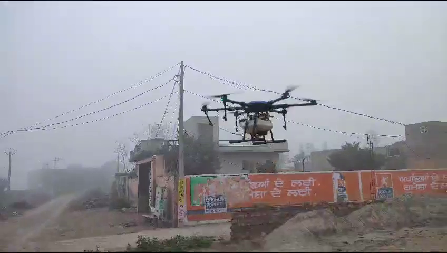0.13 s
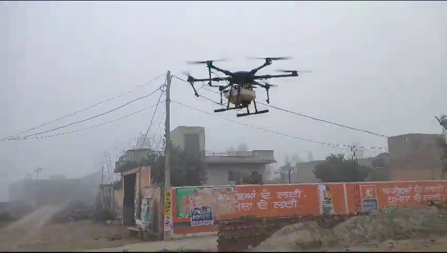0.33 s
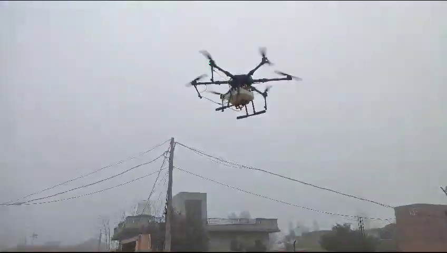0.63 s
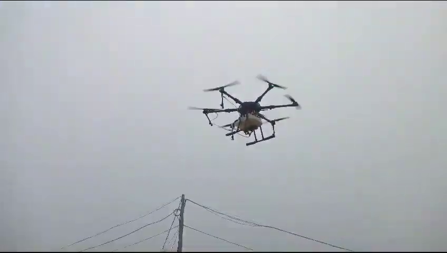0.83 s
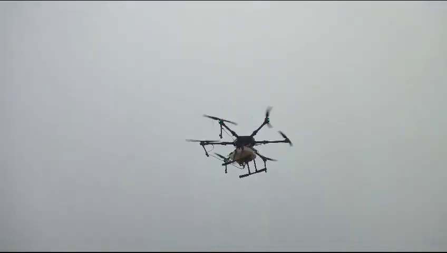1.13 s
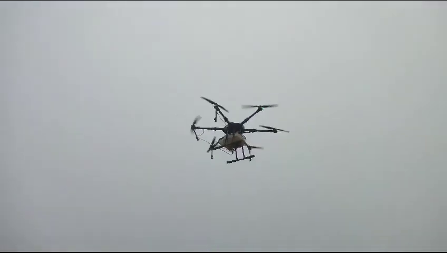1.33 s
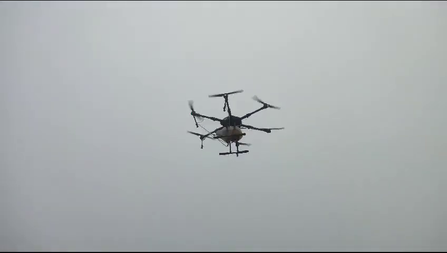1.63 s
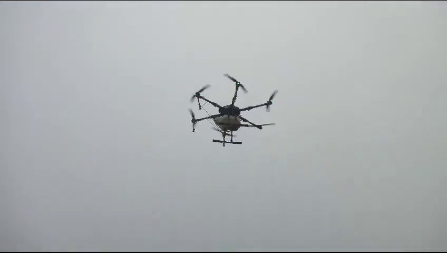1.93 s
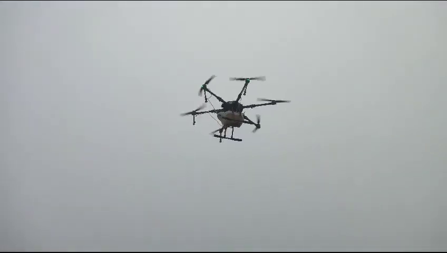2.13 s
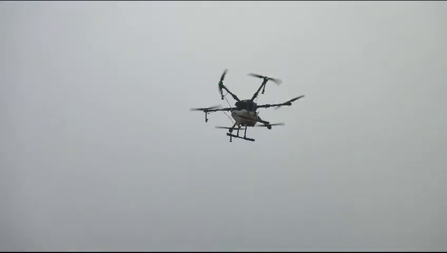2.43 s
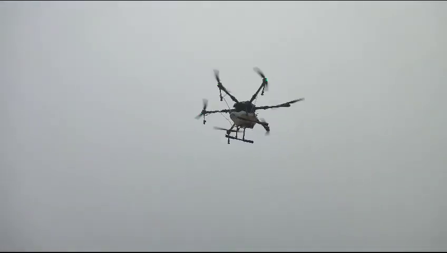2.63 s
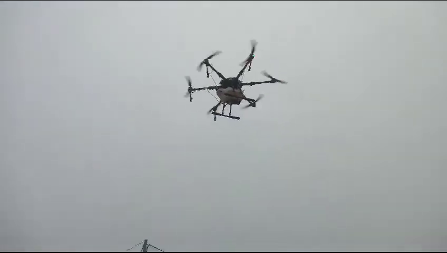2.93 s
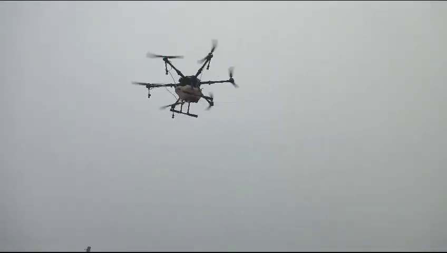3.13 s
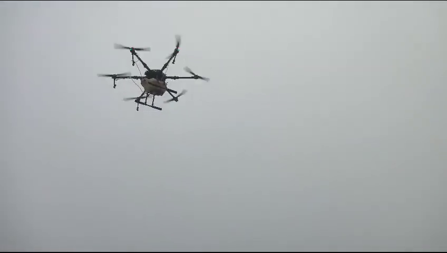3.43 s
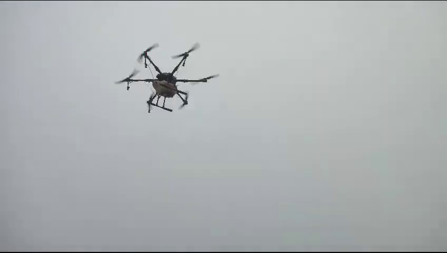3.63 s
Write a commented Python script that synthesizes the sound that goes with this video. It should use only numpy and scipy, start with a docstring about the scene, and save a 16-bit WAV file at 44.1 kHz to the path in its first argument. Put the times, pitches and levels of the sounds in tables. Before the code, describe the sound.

A big multi-rotor drone flies with a wavering buzz, choppy blade slap and hiss.

```python
"""A throbbing hum and buzz: a large six-rotor drone climbs and hovers in open air above a phone.
Rotors at slightly different speeds beat against each other. Each blade pass gives a pulse (buzz, and
a sharper slap under load) and a puff of tip hiss. In the turn, some rotors slow down and then catch
up. Light wind rumbles on the microphones."""
import sys
import numpy as np
from scipy import signal
from scipy.fft import rfft, irfft, next_fast_len
from scipy.io import wavfile
from scipy.ndimage import uniform_filter1d, map_coordinates

SR = 44100
rng = np.random.default_rng(int(sys.argv[2]) if len(sys.argv) > 2 else 0)


def log_audio(samples):
    """Write samples as a 16-bit WAV file to the path given in sys.argv[1]."""
    # one column per channel
    frames = np.atleast_2d(samples).T
    # limit to full scale, then quantise
    limited = np.clip(frames, -1, 1)
    pcm = np.round(limited * 32767).astype(np.int16)
    wavfile.write(sys.argv[1], SR, pcm)


N = 166257
T = np.arange(N) / SR
N_FFT = next_fast_len(N + 8192)
LOG_HZ = np.log(np.maximum(np.arange(N_FFT // 2 + 1) * SR / N_FFT, 1))

# Layer faders through the flight, before trims: time_s, buzz_db, slap_db, tip_hiss_db, top_hiss_db
FADERS = [(0.1, -41.5, -44, -52, -58.5), (0.31, -34.5, -46, -44.5, -49.5), (0.58, -42.5, -50, -46.5, -52),
          (1.0, -45, -47.5, -46, -51), (1.15, -43.5, -48.5, -44.5, -51), (1.6, -40.5, -37.5, -43.5, -54),
          (1.92, -38.5, -27.5, -34, -48), (2.08, -39, -30.5, -38.5, -51), (2.14, -33.5, -30, -37.5, -50),
          (2.2, -41.5, -27, -34.5, -50), (2.32, -38.5, -27, -37, -49.5), (2.68, -31.5, -27, -36.5, -48.5),
          (2.72, -28, -23, -36, -48), (2.78, -28, -24.5, -32.5, -45), (3.01, -35.5, -20.5, -39.5, -50.5),
          (3.05, -33, -21, -35, -44), (3.08, -33.5, -26.5, -38.5, -50), (3.2, -34, -31, -39.5, -50),
          (3.28, -35.5, -34, -40, -52), (3.37, -38, -43, -42.5, -53.5), (3.64, -41, -41, -45, -54),
          (3.67, -35, -42, -45, -55), (3.77, -35.5, -41, -47, -56)]
# Bright tone of the blade tips: freq_hz, gain_db
TIP_EQ = [(2000, -22), (2900, -6), (3800, -8.5), (4800, -2), (7200, -2.5), (8000, -15.5), (9000, -52),
          (11000, -47)]


def amp(db):
    return 10 ** (np.asarray(db) / 20)


def curve(table, col=1):
    points = np.array(table, float)
    return np.interp(T, points[:, 0], points[:, col])


def over_hz(table):
    points = np.array(table, float)
    return np.interp(LOG_HZ, np.log(points[:, 0]), points[:, 1])


def colour(x, eq, lo_hz, hi_hz):
    """Minimum-phase EQ, scaled to rms 1 between lo_hz and hi_hz."""
    cepstrum = irfft(over_hz(eq) * np.log(10) / 20, N_FFT)
    cepstrum[1:N_FFT // 2] *= 2
    cepstrum[N_FFT // 2 + 1:] = 0
    spectrum = rfft(x, N_FFT) * np.exp(rfft(cepstrum))
    band = spectrum[..., int(lo_hz * N_FFT / SR):int(hi_hz * N_FFT / SR)]
    rms = np.sqrt(2 * np.mean(np.sum(abs(band) ** 2, -1)) / N_FFT / N)
    return irfft(spectrum, N_FFT)[..., :N] / rms


def wander(rate_hz):
    """Smooth random drift: held steps, slewed twice."""
    hold = int(SR / rate_hz)
    steps = np.repeat(rng.standard_normal(N // hold + 1), hold)
    return 1.302 * uniform_filter1d(uniform_filter1d(steps, hold), hold)[:N]


def blade_clicks(passes, gain, mic_lag_s, jitter_s=.00004, scatter_db=1.5):
    """One slightly uneven click per blade pass, reaching the two microphones at different times."""
    count = np.arange(np.ceil(passes[0]), passes[-1])
    chance = rng.standard_normal((600, 2))[:len(count)]
    at_s = np.interp(count, passes, T) + jitter_s * chance[:, 0]
    size = amp(scatter_db * chance[:, 1]) * np.interp(at_s, T, gain)
    clicks = np.zeros((2, N))
    for ch in range(2):
        centre = (at_s[:, None] + mic_lag_s * (ch - .5)) * SR
        taps = np.floor(centre) + np.arange(-7, 9)
        offset = taps - centre
        pulses = size[:, None] * np.sinc(offset) * np.cos(np.pi * offset / 16) ** 2
        np.add.at(clicks[ch], np.clip(taps, 0, N - 1).astype(int), pulses)
    return clicks


def rotors(speed_spread=.004, puff_decay_passes=1):
    """Three rotor pairs beat into a hum; their blade passes drive the buzz, slap and puffs."""
    # Leading pair: time_s, blade_pass_hz
    lead_speed = [(0.08, 130.8), (0.2, 127.7), (0.3, 121.4), (0.44, 115.5), (0.55, 103.0), (0.63, 102.2),
                  (0.78, 103.7), (0.93, 96.3), (0.98, 98.9), (1.17, 114.0), (1.33, 122.4), (1.44, 125.5),
                  (1.6, 123.6), (1.78, 124.1), (1.86, 121.7), (1.97, 114.4), (2.1, 104.5), (2.2, 114.8),
                  (2.32, 120.7), (2.46, 127.4), (2.62, 128.7), (2.77, 139.3), (2.85, 136.6), (2.99, 131.8),
                  (3.15, 130.5), (3.3, 125.7), (3.5, 128.7), (3.77, 132.4)]
    # Second pair, cancelling the lead's hum at half passes: time_s, passes_behind, level_db
    slip = [(-.05, -.5, -4), (.16, .5, -5), (.40, 1.5, -4), (.60, 2.5, -3), (.753, 3.5, 0), (1.139, 4.5, 0),
            (1.308, 5.5, -1), (1.51, 6.5, -5), (1.715, 7.5, 0), (1.959, 8.5, -2), (2.12, 9.1, -3),
            (2.302, 8.5, -1), (2.685, 7.5, -3), (2.99, 6.5, -4), (3.141, 5.5, -1), (3.29, 4.9, -2),
            (3.457, 5.5, -.5), (3.716, 6.5, -2), (3.95, 7.5, -2)]
    # Slowest pair, lagging at lift-off and in the turn: time_s, blade_pass_hz, level_db
    slow = [(.05, 125, -13), (.3, 102, -4), (.5, 114, -1), (.7, 58, -36), (2.05, 92, -20), (2.2, 96, -1),
            (2.4, 78, -29), (2.65, 114, -16), (2.8, 91, -5.5), (2.92, 109, -0.5), (3.05, 109, -3),
            (3.17, 130, -2), (3.27, 82, -13), (3.4, 95, -52)]
    # Hum of a pair at full level: time_s, level_db
    hum_fader = [(.1, -37), (.31, -31.5), (.5, -35.5), (.68, -38.5), (.85, -45), (1.05, -35.5), (1.22, -40),
                 (1.42, -30), (1.85, -35.5), (2.15, -35), (2.45, -29.5), (2.85, -34.5), (3.05, -37.5),
                 (3.3, -34), (3.65, -35)]
    # Balance of the six rotors: pair_index, buzz_db, slap_db
    balance = [(0, 0, 0), (0, -2, -3), (1, -1, -6), (1, -3, -8), (2, -1, -9), (2, -6, -12)]
    lead_hz = curve(lead_speed)
    lead = np.cumsum(lead_hz) / SR
    pairs = [(lead, np.ones(N)),
             (lead - uniform_filter1d(curve(slip), SR // 10), amp(curve(slip, 2))),
             (np.cumsum(curve(slow)) / SR, amp(curve(slow, 2)))]
    hum = sum(gain * np.cos(2 * np.pi * phase) for phase, gain in pairs) * amp(curve(hum_fader))
    buzz, slap, puffs = 0, 0, 0
    for k, (pair, buzz_db, slap_db) in enumerate(balance):
        phase, gain = pairs[int(pair)]
        passes = phase + rng.random()
        drift = np.cumsum(speed_spread * wander(4) * lead_hz) / SR
        passes += k % 2 * drift  # one of each pair strays from its twin
        wobble = amp(2 * wander(5.124))
        clicks = blade_clicks(passes, gain * wobble, mic_lag_s=.00014 * rng.standard_normal())
        buzz -= amp(buzz_db) * clicks
        slap -= amp(slap_db) * clicks
        puffs += gain ** 2 * np.exp(-(passes % 1) / puff_decay_passes)
    return hum, buzz, slap, puffs


def blade_buzz(clicks, shelf_hz=323, trim_db=2):
    """Blade pulses run together into a low buzz whose bottom end swells and thins."""
    # Body of the buzz: freq_hz, gain_db
    buzz_eq = [(150, -28.5), (190, 3), (260, -2), (340, -1), (480, 3), (600, -3.5), (800, -4.5),
               (1200, -27), (2000, -52.5)]
    # Weight of the lowest harmonics: time_s, gain_db
    shelf = [(.9, -2), (1.15, 0), (1.5, -5), (1.95, -10.5), (2.15, 1.5), (2.5, -10), (2.8, -1), (3.5, 3)]
    buzz = colour(clicks, buzz_eq, 200, 700) * amp(curve(FADERS, 1) + trim_db)
    lows = signal.sosfiltfilt(signal.butter(2, shelf_hz, fs=SR, output="sos"), buzz)
    return buzz + (amp(curve(shelf)) - 1) * lows


def blade_slap(clicks, trim_db=-2, echo_s=.0027, echo_skew_s=.0001, echo_db=-5.5):
    """Loaded blades slap the air; the drone's arms and tank throw each slap back."""
    # Midrange bite of the slap: freq_hz, gain_db
    slap_eq = [(400, -28.5), (700, -5.5), (900, 1), (1090, 1), (1270, 2.5), (1450, -0.5), (1900, 0.5),
               (2400, -3.5), (2900, -19), (4800, -10), (7000, -36), (8200, -46)]
    crack_s, crack_width_s, crack_db = 3.047, .02, -30  # a few slaps sharpen at the height of the turn
    crack = amp(crack_db) * np.exp(-((T - crack_s) / crack_width_s) ** 2)
    slap = colour(clicks, slap_eq, 800, 2400) * amp(curve(FADERS, 2) + trim_db)
    slap += colour(clicks, TIP_EQ, 3980, 5600) * crack
    echo = np.array([map_coordinates(slap[ch], [(T - echo_s - ch * echo_skew_s) * SR]) for ch in (0, 1)])
    return (slap + echo * amp(echo_db)) / np.sqrt(1 + amp(2 * echo_db))


def rotor_air(puffs, puff_depth=.49):
    """Tip hiss, rushing air and a high sizzle, all puffing with the blade passes."""
    # Stereo image, mono lows to wide highs: freq_hz, left_right_likeness (clipped to 0-1)
    image = [(60, 4), (130, 10), (290, 1.9), (640, 0.5), (1410, 0.46), (3100, 0.34), (6820, -0.39),
             (15000, -0.76)]
    # Rush of air through the rotors: time_s, level_db
    rush_fader = [(.1, -48.5), (.3, -41), (.9, -44.5), (1.5, -43), (1.9, -39), (2.1, -35.5), (2.6, -34.5),
                  (2.95, -37), (3.12, -33.5), (3.25, -32), (3.4, -40.5), (3.77, -46)]
    # Tone of that rush: freq_hz, gain_db
    rush_eq = [(150, -6), (300, -3.5), (700, -1), (1900, 1.5), (2400, -3), (2900, -36.5), (4000, -18),
               (6000, -51)]
    pulsing = 1 - puff_depth + puff_depth * puffs / uniform_filter1d(puffs, SR // 10)
    mid, side = rfft(pulsing * rng.standard_normal((2, N)), N_FFT)
    likeness = np.clip(over_hz(image), 0, 1)
    mid *= np.sqrt(1 + likeness)
    side *= np.sqrt(1 - likeness)
    air = irfft([mid + side, mid - side], N_FFT)[:, :N]
    flutter = amp(wander(8.14))
    tip_hiss = colour(air, TIP_EQ, 4630, 6770) * amp(curve(FADERS, 3))
    rush = colour(air, rush_eq, 800, 2400) * amp(curve(rush_fader))
    top_hiss = colour(air, over_top_eq(), 9000, 15000) * amp(curve(FADERS, 4))
    return (tip_hiss + rush) * flutter + top_hiss


def over_top_eq():
    """Tone of the high sizzle."""
    # Top-octave hiss: freq_hz, gain_db
    top_eq = [(6000, -56), (8200, 4), (10000, -0.5), (14800, -0.5), (16000, -11)]
    return top_eq


def wind_rumble(gust_db=3, left_bias_db=8):
    """Wind buffets each microphone separately, harder on the left."""
    # Rise and fall of the breeze: time_s, level_db
    breeze = [(0.1, -73), (0.12, -55.5), (0.55, -42.5), (1.94, -64), (2.92, -53), (3.07, -61), (3.57, -54),
              (3.68, -59), (3.77, -63)]
    # Deep tone of the buffeting: freq_hz, gain_db
    rumble_eq = [(10, -10), (30, 1), (45, -5), (68, 3.5), (90, -13), (200, -19), (400, -78)]
    gusts = gust_db * np.array([wander(4.4), wander(5.0)])
    level_db = curve(breeze) + gusts + np.array([[.5], [-.5]]) * left_bias_db
    return colour(rng.standard_normal((2, N)), rumble_eq, 15, 75) * amp(level_db)


def scene():
    hum, buzz_clicks, slap_clicks, puffs = rotors()
    return hum + blade_buzz(buzz_clicks) + blade_slap(slap_clicks) + rotor_air(puffs) + wind_rumble()


def record(dry):
    """Each microphone has its own colour; the sound fades in quickly and the very top is cut."""
    # Stereo lean: freq_hz, left_minus_right_db
    lean = [(60, 1.0), (110, 0.5), (200, 0.5), (380, 1.0), (700, 1.0), (1290, 3.0), (2380, 2.5),
            (4400, 3.5), (8120, -1.0), (15000, 4.5)]
    start_s, fade_s, fade_from, cutoff_hz = .069, .043, .2, 15800
    mic_gain = amp(over_hz(lean) * np.array([[.5], [-.5]]))
    mics = irfft(rfft(dry, N_FFT) * mic_gain, N_FFT)[:, :N]
    fade_in = (T > start_s) * np.clip(fade_from + (T - start_s) / fade_s, 0, 1)
    return signal.sosfilt(signal.ellip(10, .2, 80, cutoff_hz, fs=SR, output="sos"), mics * fade_in)


dry = scene()
out = record(dry)
log_audio(out)
```